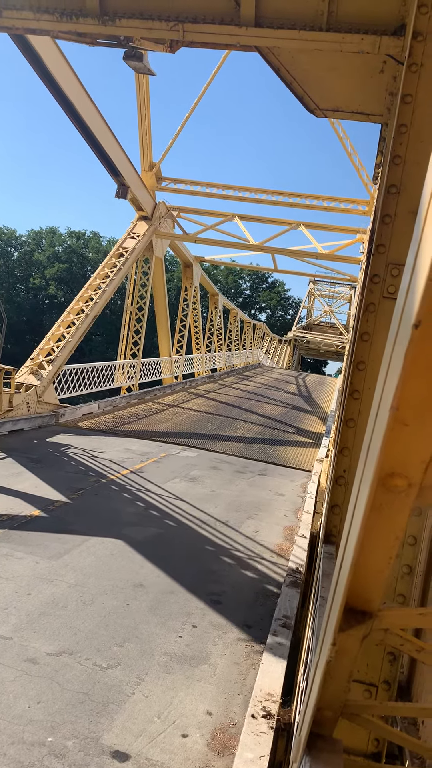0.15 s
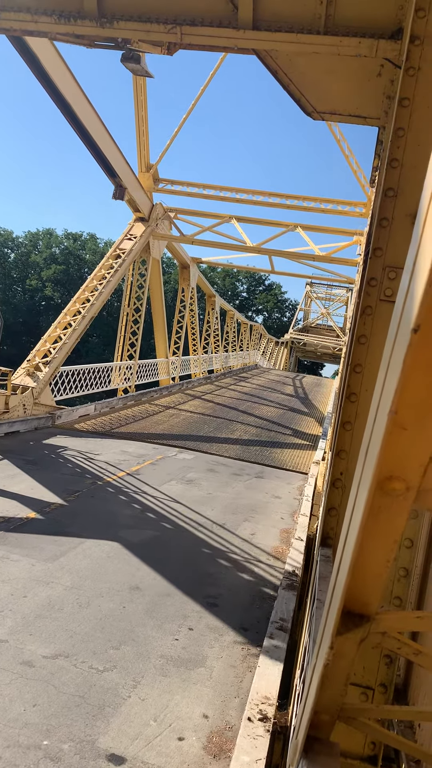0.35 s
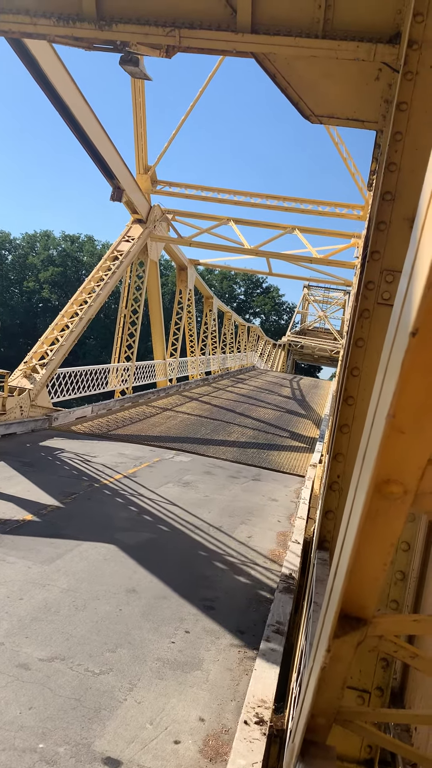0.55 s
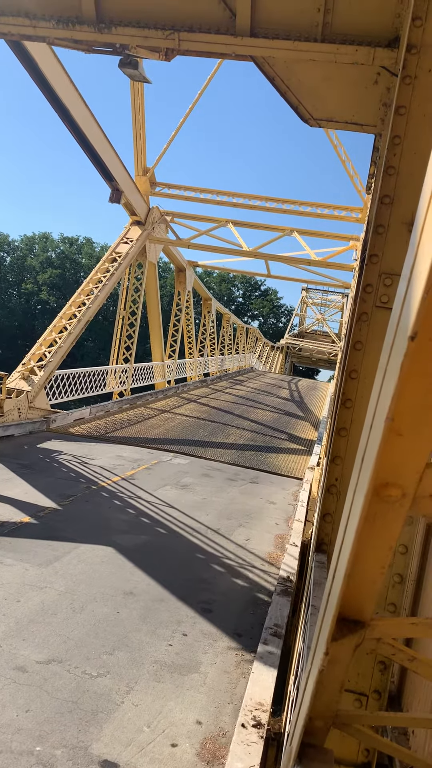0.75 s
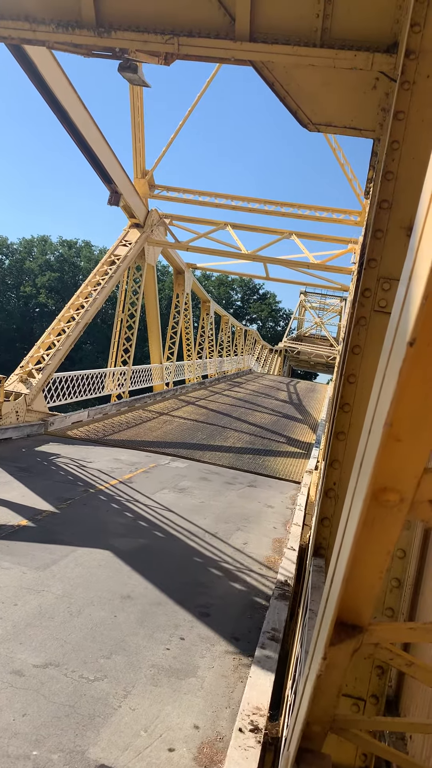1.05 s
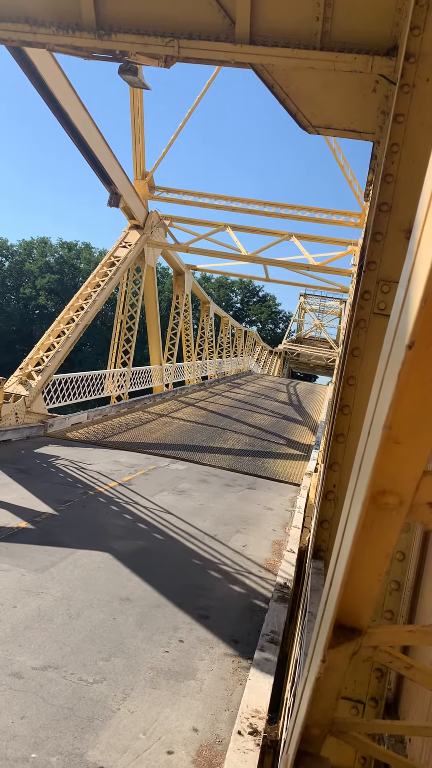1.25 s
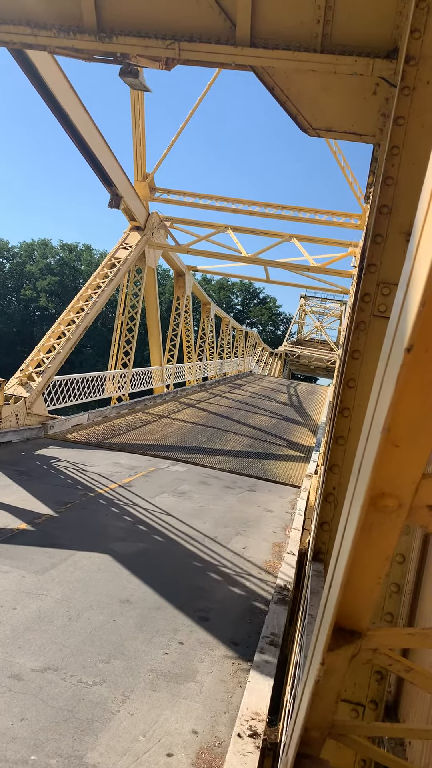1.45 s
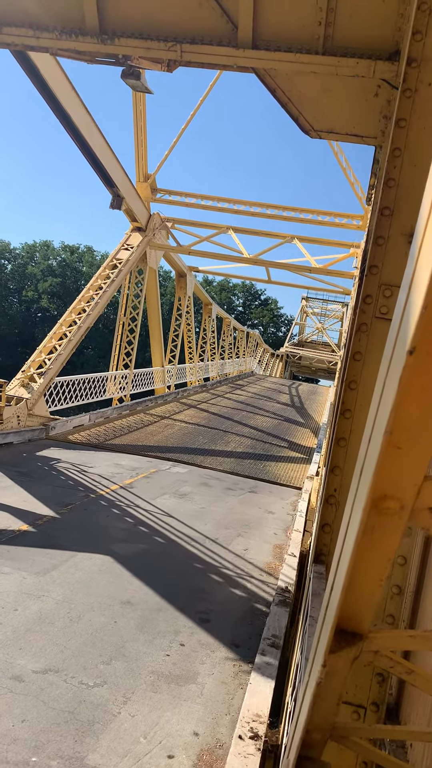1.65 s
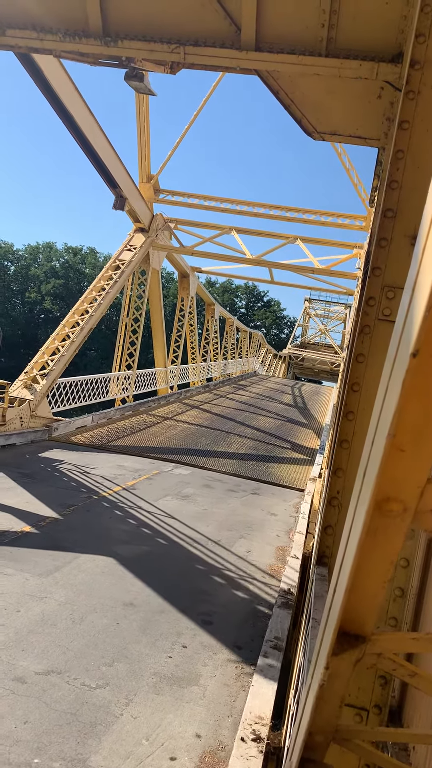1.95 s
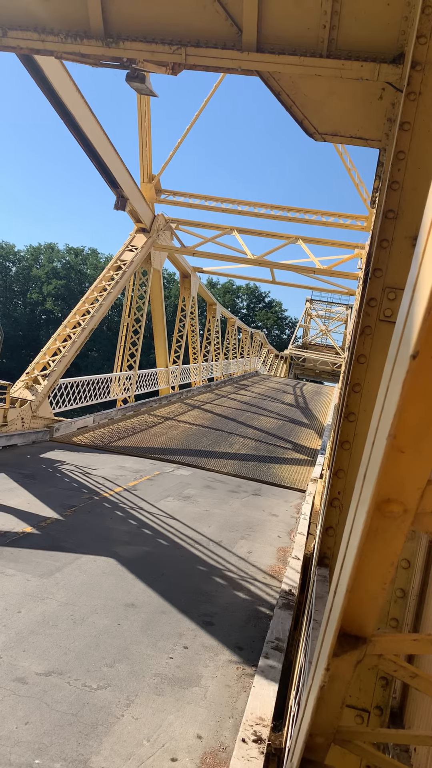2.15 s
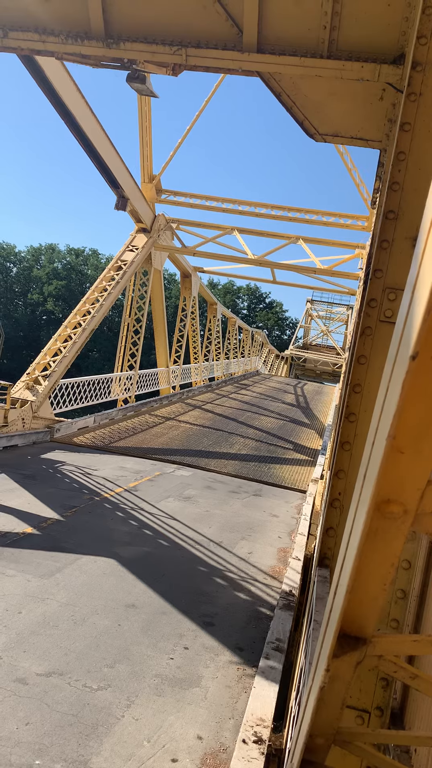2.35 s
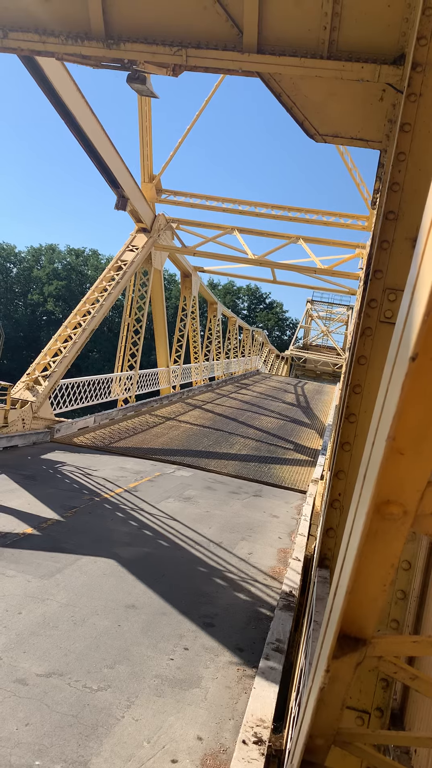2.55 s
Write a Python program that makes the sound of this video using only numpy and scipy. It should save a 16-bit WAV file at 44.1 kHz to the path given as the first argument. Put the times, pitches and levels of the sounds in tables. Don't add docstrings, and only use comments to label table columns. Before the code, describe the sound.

Low droning gear hum of bridge machinery climbs a little and settles over buzz, roar and hiss

```python
import sys
import numpy as np
from scipy import signal
from scipy.fft import rfft, irfft
from scipy.io import wavfile

SR = 44100
rng = np.random.default_rng(int(sys.argv[2]) if len(sys.argv) > 2 else 0)


def volts_from_db(level):
    exponent = np.asarray(level, float) / 20
    return 10 ** exponent


def log_audio(samples):
    frames = np.atleast_2d(samples).T
    limited = np.clip(frames, -1, 1)
    pcm = np.round(limited * 32767).astype(np.int16)
    wavfile.write(sys.argv[1], SR, pcm)


N = 118629
T = np.arange(N) / SR

# time [s], level [dB].
MESH_LOAD = [(0, -15.5), (.09, -18), (.155, -14), (.22, -14), (.3, -14.5), (.37, -23.5), (.44, -17),
             (.5, -19.5), (.58, -14), (.76, -11.5), (.9, -15.5), (.98, -10), (1.45, -10), (1.7, -10.5),
             (1.9, -9.5), (2.4, -11.5), (2.5, -10), (2.69, -10)]
# time [s], depth [dB], width [s].
ECHO_NULLS = [(.05, 11, .013), (.115, 9, .011), (.183, 10, .007), (.258, 6, .008), (.33, 8, .01),
              (.41, 8, .01), (.47, 9, .008), (.537, 14, .011), (.611, 4, .009), (.705, 2.5, .015),
              (.855, 14, .018), (1.53, 2, .02), (1.68, 2, .02), (2.59, 2, .03)]
# time [s], frequency [Hz].
MESH_PITCH = [(0, 223), (.2, 225), (.3, 227), (.4, 230), (.5, 235), (.58, 237), (.66, 239.5), (.76, 241),
              (.85, 243), (.93, 245), (1.0, 246.2), (1.15, 246.9), (1.35, 245.7), (1.7, 247.4),
              (2.2, 246.9), (2.45, 245.5), (2.6, 246.8), (2.69, 247.5)]
# time [s], level [dB].
LAYSHAFT_LEVEL = [(0.0, -30.5), (0.16, -34), (0.38, -24), (0.75, -29.5), (1.03, -28.5), (1.09, -50.5),
                  (1.24, -29.5), (1.62, -35.5), (2.69, -40.5)]
# time [s], strength [0-1].
TIGHT_SPOTS = [
    (.15, 0.7),
    (0.408, 0.98),
    (.84, 0.7),
    (0.999, 0.91),
    (1.319, 0.4),
    (1.537, 1),
    (1.801, 0.1),
    (2.05, 0.8),
    (2.402, 0),
    (2.582, 1),
]
# frequency [Hz], level between [dB], rise [dB], left lead [rad].
DECK_MODES = [
    (334.2, -40.5, 12.5, -0.34),
    (372, -44, 3, -.1),
    (354, -40.5, 3, -.2),
]
# frequency [Hz], peak [dB], time [s], width [s].
STRUT_MODES = [(561.6, -35, .8, .13), (458, -23.5, .22, .012), (450, -38, .12, .07), (280, -30, .24, .1),
               (350, -30, .69, .025), (341, -27.5, .415, .03), (340, -24.5, .13, .02),
               (342, -25.5, .07, .01), (330, -29, .52, .018), (670, -41.5, .18, .15), (468, -31, .5, .04),
               (476, -29, .75, .014), (290, -31, .58, .04), (137.7, -30.5, .68, .03)]
# frequency [Hz], width [Hz], level [dB], swing per wheel turn [dB].
GIRDER_MODES = [(90.6, 3.3, -39, -7), (110, 20, -41, -8), (194.3, 30, -37, 2.5), (284.3, 34, -34.5, -0.5),
                (412.9, 6.1, -40, 9), (570.3, 19, -42, 5.5), (675, 120, -51.5, -0.5),
                (777, 6.8, -43.5, 1.5), (1148, 27, -55, 2.5), (1216.5, 5.5, -49, -6.5),
                (2049, 62, -46.5, -2.5), (714.4, 6.4, -45, 0.5), (1419, 32, -47.5, 5.5), (1722, 55, -51, 0)]
# multiple of twice the mains, left level [dB], right level [dB], left lead [rad].
MOTOR_BUZZ = [(1, -41, -41, 0), (2, -34, -35, -.1), (3, -43, -43, 0), (5, -38, -48, -.35),
              (6, -47, -45, 2.7), (7, -42, -40, -.15), (8, -45, -37, -.6), (9, -47, -47, -1.1),
              (10, -42, -37, -1), (11, -45, -40, -.8), (12, -48, -48, 2), (13, -50, -49, 1.7),
              (14, -54, -56, -2.6), (15, -48, -46, .85), (16, -48, -49, .65), (17, -60, -54, 1.1),
              (18, -59, -59, .6), (19, -60, -60, .6), (20, -62, -62, 1), (22, -64, -64, 2)]
# frequency [Hz], level [dB], left lead [rad].
DRIVE_WHINES = [(12035, -84, 1.6), (12400, -90, 2.2), (9435, -90, 2.6), (11720, -95, .6), (7532, -84, .6),
                (7649, -86, .6), (3237, -68, -.9)]
# frequency [Hz], level [dB per Hz].
HISS_SPECTRUM = [(2500, -10.5), (3250, 1), (4200, 5.5), (5300, 1.5), (7000, -11.5), (8800, -24),
                 (10500, -43), (15300, -43)]
# time [s], rise over the hiss [dB], length [s].
LOOSE_RATTLES = [
    (.03, 7, .012),
    (.09, 11.5, .014),
    (.16, 5, .006),
    (.35, 3, .04),
    (.99, 4, .006),
    (1.86, 4, .006),
    (2.01, 4, .006),
    (2.06, 5, .012),
    (2.46, 2.5, .006),
    (2.6, 4, .012),
]
# frequency [Hz], level [dB per Hz].
ROAR_SPECTRUM = [(28, -32.5), (45, -13.5), (70, -4), (150, -7.5), (300, -11.5), (650, -20), (1900, -25),
                 (3300, -36)]
# frequency [Hz], left-right likeness [-1 to 1].
PORT_LIKENESS = [(60, .9995), (140, .995), (340, .96), (550, .6), (950, .6), (1660, .35), (2880, -.05)]
# frequency [Hz], left minus right [dB].
PORT_LEAN = [(500, 0), (1100, -2), (1700, -1.5), (2400, 0)]
# delay [s], gain [ratio].
REFLECTIONS = [
    (.0093, -.16),
    (.0167, .18),
    (.0231, -.16),
    (.029, .16),
]


def rms_one(x):
    return x / np.sqrt(np.mean(x ** 2) + 1e-20)


def in_time(rows):
    s, value = np.transpose(rows)
    return np.interp(T, s, value)


def at_hz(points, hz):
    table_hz, value = np.transpose(points)
    return np.interp(np.log(hz), np.log(table_hz + 1), value)


def drift(rate):
    r = np.exp(-80 * np.pi * rate / SR)
    slow = signal.lfilter([1], [1, -2 * r, r * r], rng.standard_normal(N // 40 + 2002))[2000:]
    return np.interp(np.arange(N) / 40, np.arange(len(slow)), rms_one(slow))


def bumps(rows):
    return sum(height * np.exp(-.5 * ((T - s) / width) ** 2) for s, height, width in rows)


def tone(phase, db, lead):
    return np.sqrt(2) * volts_from_db(db) * np.sin(phase + np.array([[.5], [-.5]]) * lead)


def gears():
    db = in_time(MESH_LOAD) - bumps(ECHO_NULLS)
    hz = in_time(MESH_PITCH) + .5 * drift(9.4)
    phase = 2 * np.pi * np.cumsum(hz) / SR - 1.6
    mesh = tone(phase, db - 0.91 * drift(9), -0.2)
    octave = tone(2 * phase, -44 + 0.95 * drift(3.0), -.1)
    third = tone(3 * phase + 1, -49 + 3 * drift(13), -.3)
    layshaft = tone(.226 * phase, in_time(LAYSHAFT_LEVEL) + 0.5 * drift(12), 0)
    return mesh + octave + third + layshaft


def deck(turn):
    out = 0
    for hz, db, rise_db, lead in DECK_MODES:
        phase = 2 * np.pi * hz * T + .8 * drift(4)
        out = out + tone(phase, db + rise_db * turn + 1.5 * drift(6), lead)
    return out


def struts():
    out = 0
    for hz, db, s, width in STRUT_MODES:
        phase = 2 * np.pi * hz * T + .5 * drift(5)
        out = out + bumps([(s, 1, width)]) * tone(phase, db + drift(20), -0.32)
    return out


def pinion(turn):
    ratio, run_up_s = .546, .55
    phase = 2 * np.pi * ratio * np.cumsum(in_time(MESH_PITCH)) / SR
    early_db = -7 * np.clip(1 - T / run_up_s, 0, 1)
    return tone(phase + .8 * drift(4), -36.5 + early_db + 12.5 * turn + 1.5 * drift(6), 0)


def spread(pair, hz):
    alike = np.clip(at_hz(PORT_LIKENESS, hz), -1, 1)
    middle = np.sqrt(1 + alike) * pair[0]
    side = np.sqrt(1 - alike) * pair[1] * [[1], [-1]]
    return (middle + side) * volts_from_db(at_hz(PORT_LEAN, hz) * np.array([[.5], [-.5]]))


def girders(turn):
    out = 0
    for hz, width_hz, db, swing_db in GIRDER_MODES:
        r = np.exp(-np.pi * width_hz / SR)
        resonance = [1, -2 * r * np.cos(2 * np.pi * hz / SR), r * r]
        shake = rng.standard_normal((2, N + SR)) * volts_from_db(2 * swing_db * np.r_[np.zeros(SR), turn])
        ringing = signal.lfilter([1, 0, -1], resonance, shake)[:, SR:]
        out = out + volts_from_db(db) * rms_one(spread(ringing, hz))
    return out


def motor():
    buzz_hz = 119.99
    out = 0
    for k, left, right, lead in MOTOR_BUZZ:
        cycles = k * buzz_hz * T + k % 2 / 4 + .12 * rng.random()
        db = np.array([[left], [right]]) - 1.2 + 2.2 * drift(3)
        out = out + tone(2 * np.pi * cycles + .3 * drift(4), db, lead)
    for hz, db, lead in DRIVE_WHINES:
        out = out + tone(2 * np.pi * hz * T + drift(8), db + 3 * drift(3), lead)
    return out


def bands(spectrum, patchy_db, extra_db, tilt):
    white, together = rng.standard_normal((2, 2, N + 8000)), drift(0.84)
    bottom, top = spectrum[0][0], spectrum[-1][0]
    edges = np.geomspace(bottom, top, num=int(3 * np.log2(top / bottom)) + 2)
    for k, (low, high) in enumerate(zip(edges, edges[1:])):
        hz = np.sqrt(low * high)
        band = signal.butter(2, [low, high], "band", fs=SR, output="sos")
        pair = signal.sosfilt(band, white[k % 2])[:, 8000:]
        flicker_db = patchy_db * (2.0 * together + drift(19))
        yield hz, pair * volts_from_db(at_hz(spectrum, hz) + flicker_db + extra_db * (hz / 6000) ** tilt)


def echoes(x):
    return x + sum(gain * np.roll(x, int(s * SR), axis=-1) for s, gain in REFLECTIONS)


def hiss(turn):
    extra_db = 1.5 * turn + bumps(LOOSE_RATTLES)
    near, stray = sum(pair for hz, pair in bands(HISS_SPECTRUM, patchy_db=1.0, extra_db=extra_db, tilt=1.0))
    hz = np.arange(N // 2 + 1) * SR / N
    housing = rfft(near) * (1 + 0.82 / (1 + 2j * (hz - 3225) / 200))
    lag = 2 * np.pi * (hz - 2640) * .000238
    bent_lag = lag - .19 * np.sin(2 * lag)
    near, late = echoes(irfft(housing * np.exp(-1j * np.outer([0, 1], bent_lag)), N))
    return volts_from_db(-47) * rms_one(np.array([near + .05 * stray, late + .05 * stray[::-1]]))


def rumble(turn):
    noise = bands(ROAR_SPECTRUM, patchy_db=.8, extra_db=1.2 * turn, tilt=0)
    return volts_from_db(-26) * rms_one(echoes(sum(spread(pair, hz) for hz, pair in noise)))


def scene():
    turn_width_s, steel_top_hz = .055, 2750
    turn = bumps([(s, strength, turn_width_s) for s, strength in TIGHT_SPOTS])
    low_pass = signal.butter(8, steel_top_hz, fs=SR, output="sos")
    steel = signal.sosfilt(low_pass, girders(turn) + rumble(turn))
    singing = deck(turn) + struts() + pinion(turn)
    return gears() + singing + steel + motor() + hiss(turn)


def roll_off(x):
    return signal.sosfilt(signal.butter(12, 15400, fs=SR, output="sos"), x)


def record(dry):
    low_hz, start_s, end_s, image_db = 40, .0003, .001, -67
    heard = signal.sosfilt(signal.butter(3, low_hz, "high", fs=SR, output="sos"), dry)
    fade_in = np.sin(np.pi / 2 * np.minimum(T / start_s, 1)) ** 2
    fade_out = np.sin(np.pi / 2 * np.minimum(T[::-1] / end_s, 1)) ** 2
    heard = heard * fade_in * fade_out
    image = volts_from_db(image_db) * 2 * np.cos(2 * np.pi * SR / 4 * T) * heard.mean(axis=0)
    return roll_off(heard + image)


dry = scene()
out = record(dry)
log_audio(out)
```